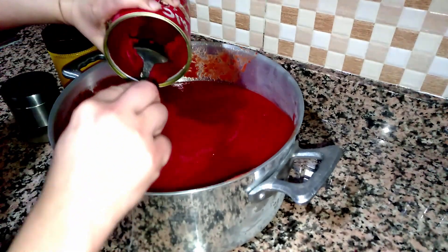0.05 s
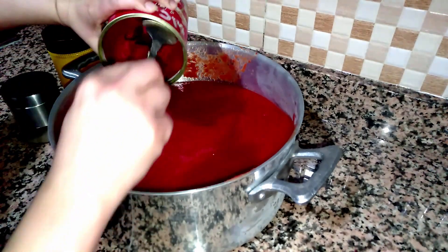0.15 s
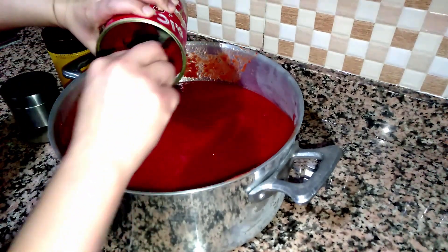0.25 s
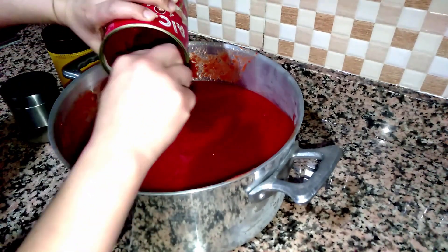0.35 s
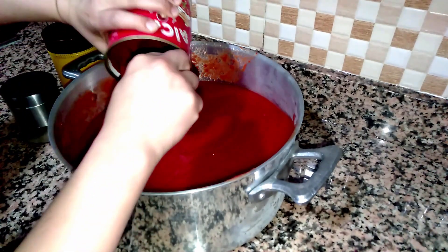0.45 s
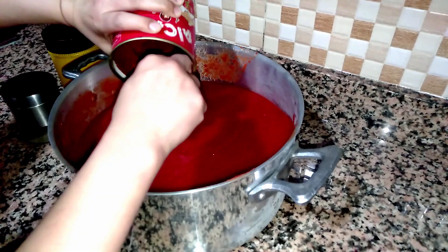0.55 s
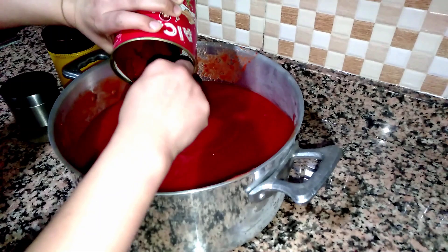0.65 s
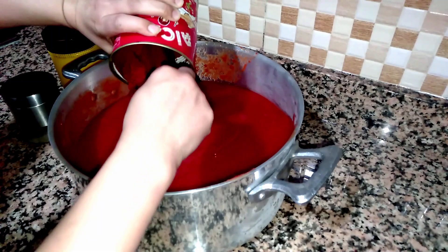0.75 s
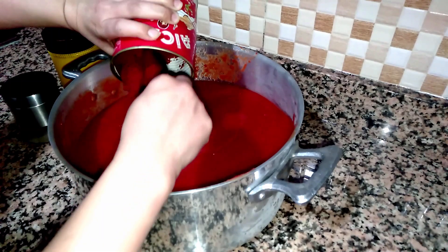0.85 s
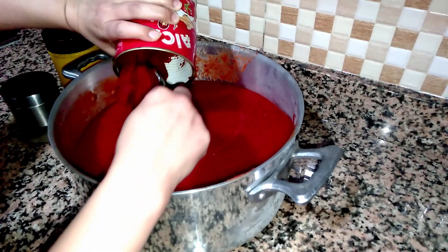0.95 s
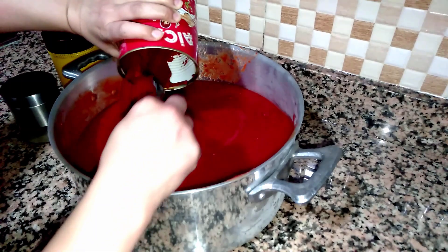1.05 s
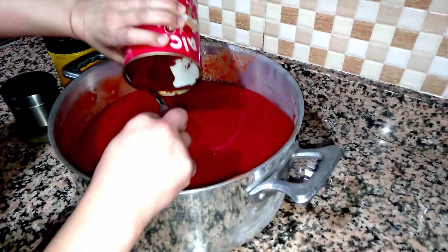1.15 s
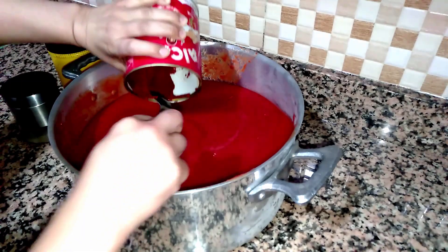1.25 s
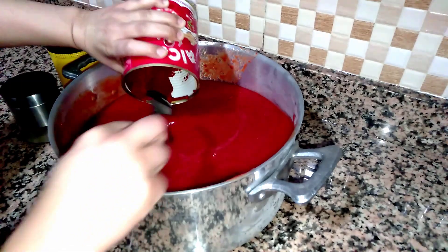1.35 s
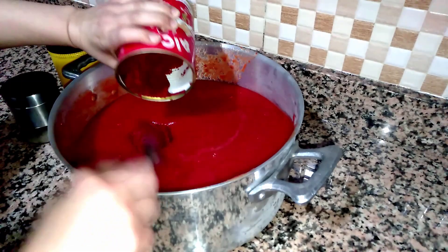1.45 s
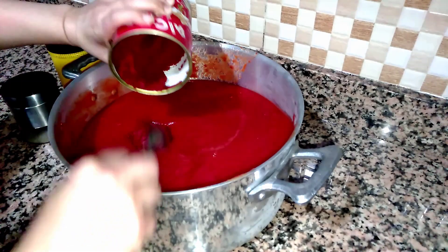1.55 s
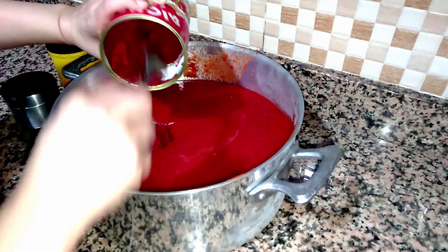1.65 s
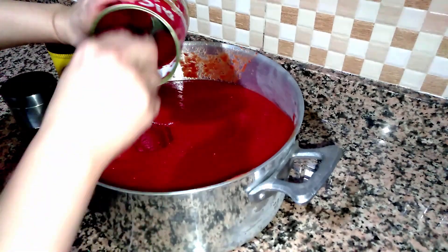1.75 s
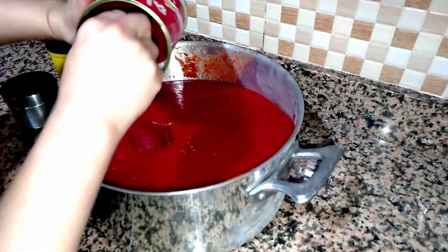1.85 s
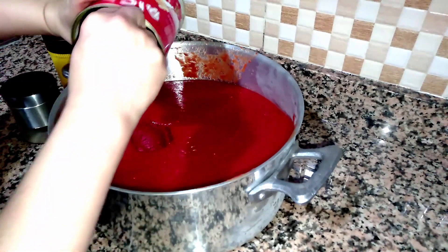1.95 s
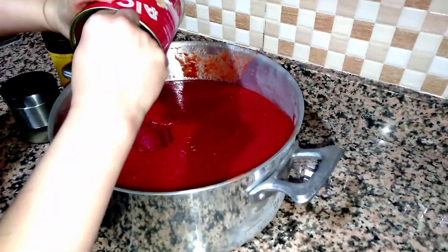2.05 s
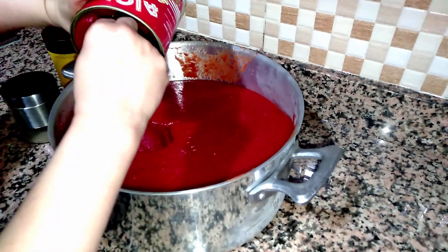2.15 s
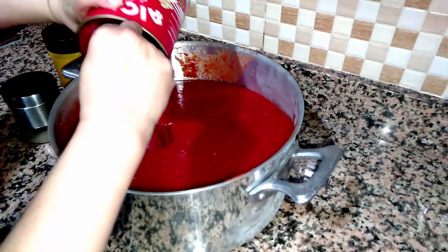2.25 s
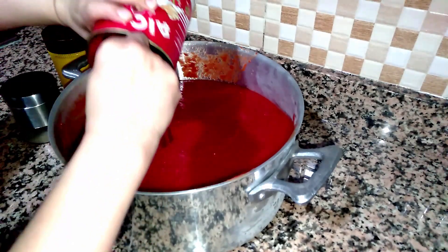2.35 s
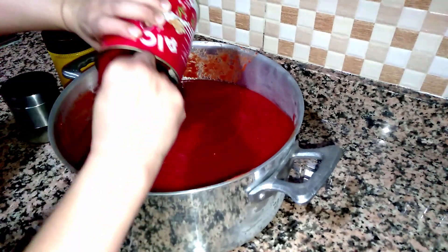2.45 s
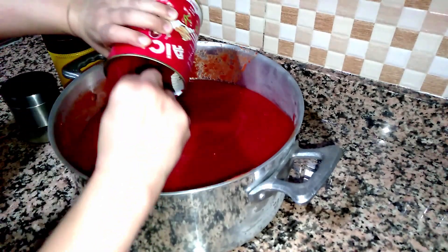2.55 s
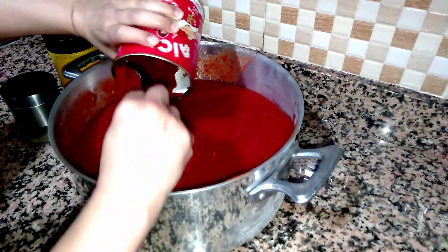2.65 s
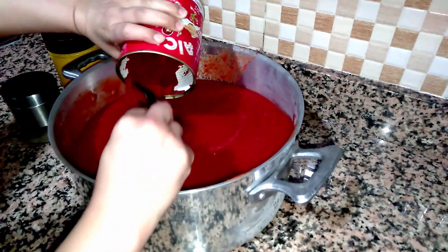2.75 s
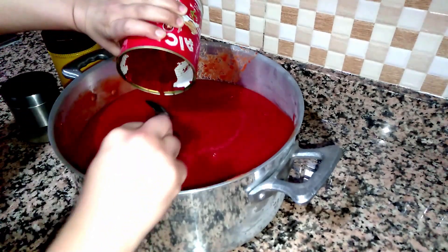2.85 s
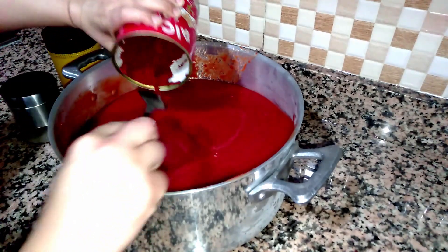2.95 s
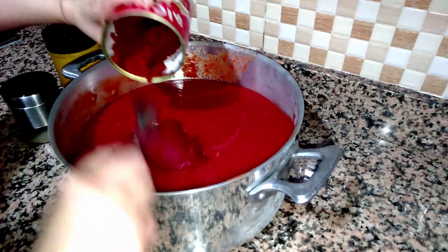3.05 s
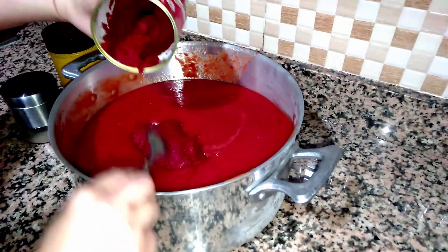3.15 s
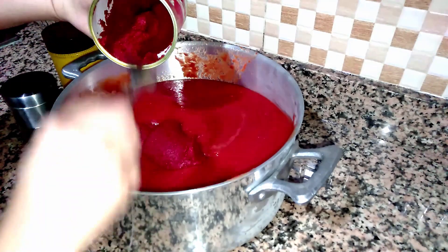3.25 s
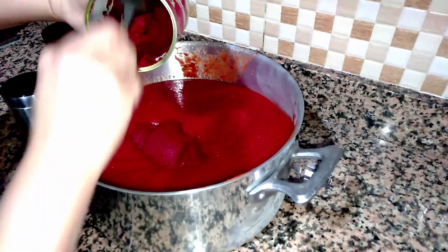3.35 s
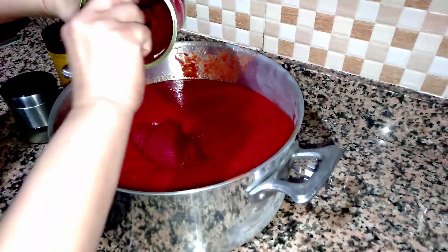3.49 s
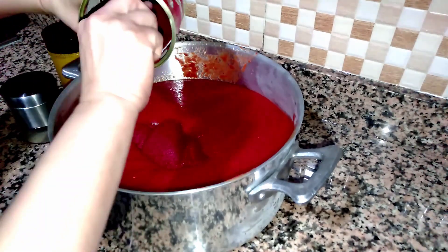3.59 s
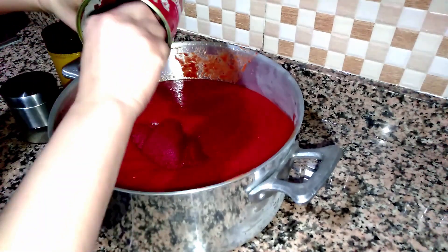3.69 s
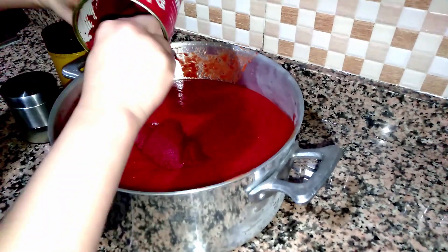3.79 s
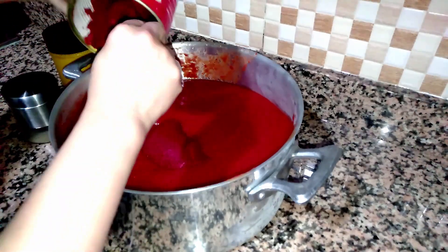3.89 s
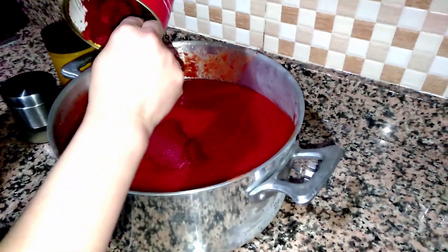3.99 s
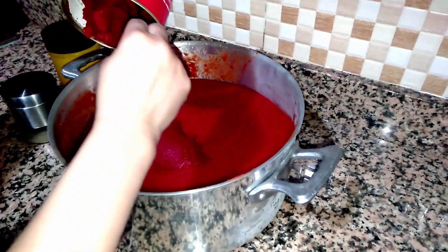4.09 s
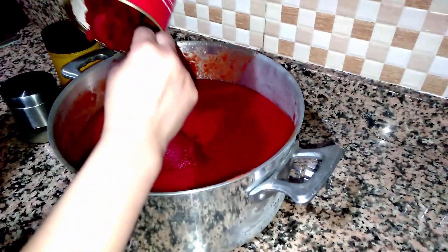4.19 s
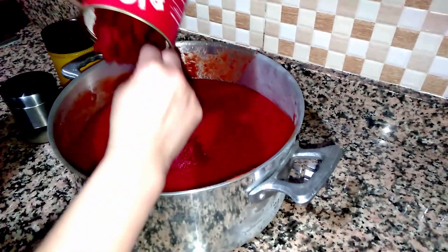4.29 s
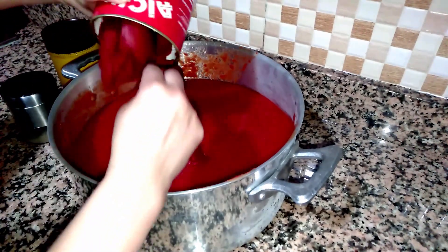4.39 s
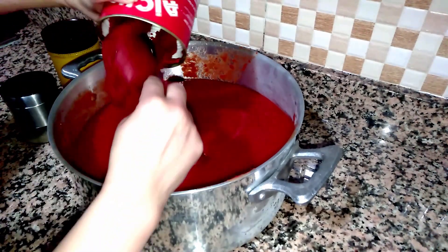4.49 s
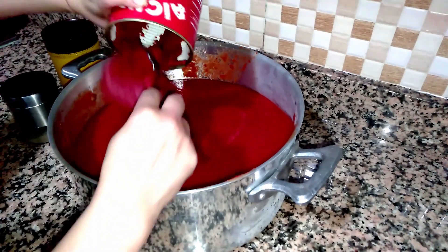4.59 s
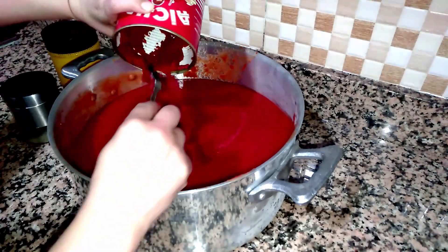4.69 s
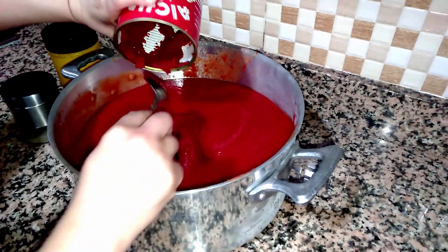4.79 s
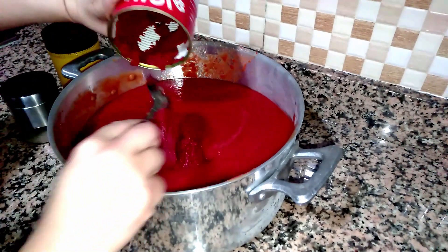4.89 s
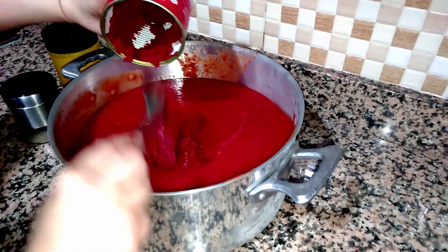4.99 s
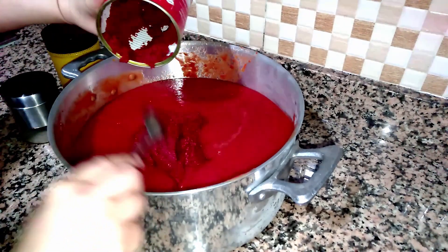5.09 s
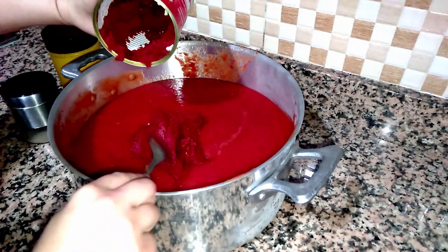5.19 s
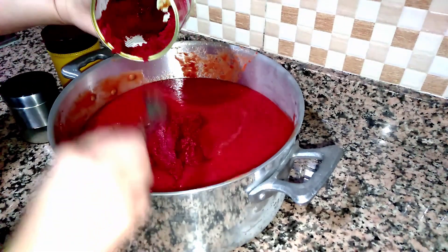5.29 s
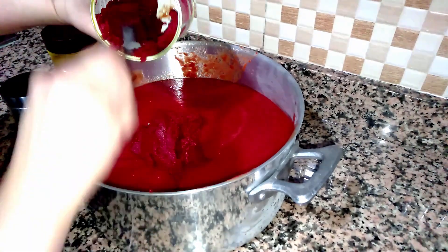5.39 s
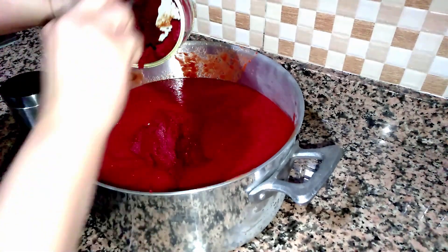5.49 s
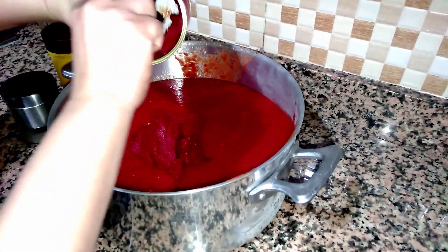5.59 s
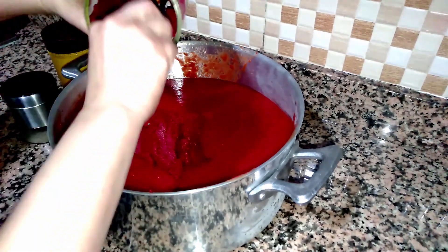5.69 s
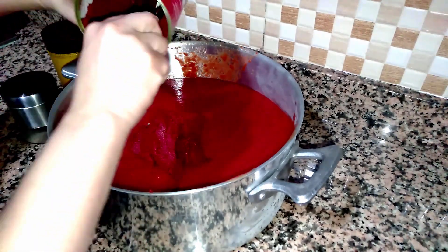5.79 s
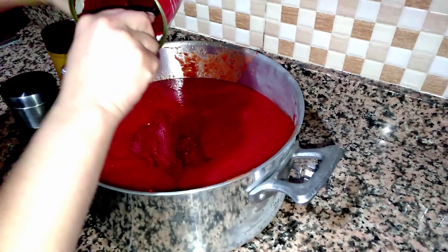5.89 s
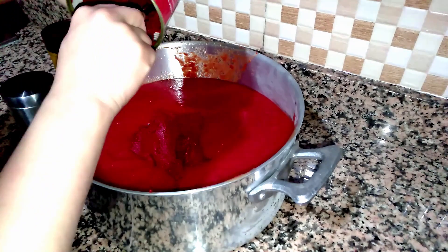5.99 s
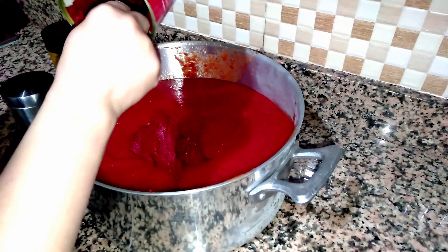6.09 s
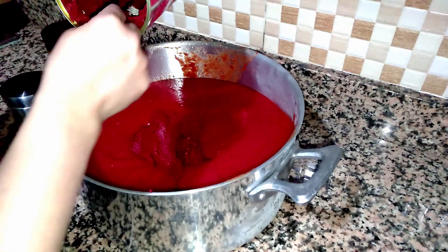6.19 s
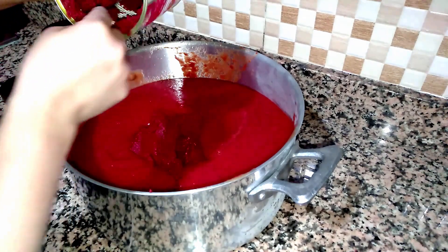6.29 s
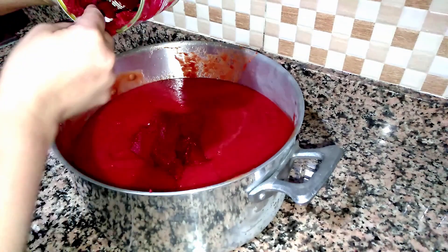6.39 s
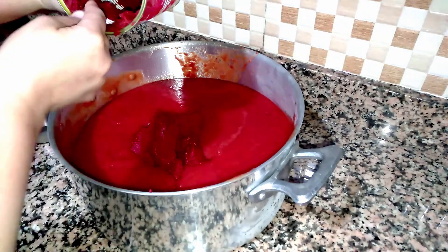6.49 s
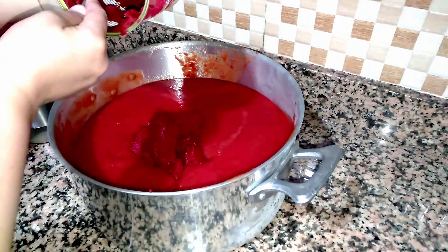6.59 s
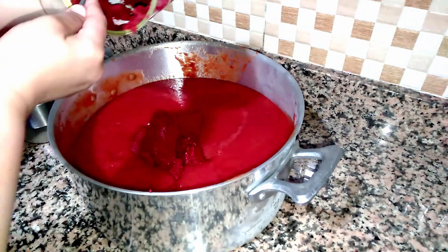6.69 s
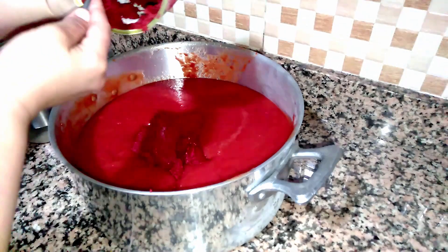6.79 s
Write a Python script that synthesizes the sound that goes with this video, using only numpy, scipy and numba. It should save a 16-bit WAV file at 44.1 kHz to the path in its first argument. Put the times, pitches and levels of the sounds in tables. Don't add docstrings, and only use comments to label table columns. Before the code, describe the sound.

Close, small kitchen: faint raspy spoon scrapes and tinny ticks in a can, with five sharp cracking knocks towering over them.

```python
import sys
import numpy as np
from scipy import signal
from scipy.fft import rfft, irfft, next_fast_len
from scipy.io import wavfile
from scipy.ndimage import map_coordinates
from numba import njit

SR = 44100
rng = np.random.default_rng(int(sys.argv[2]) if len(sys.argv) > 2 else 0)


def gain_from_db(level_db):
    decades = np.asarray(level_db, float) / 20
    return 10 ** decades


def to_wav(sig):
    pcm = np.clip(np.atleast_2d(sig), -1, 1) * 32767
    pcm = np.round(pcm).astype(np.int16)
    wavfile.write(sys.argv[1], SR, pcm.T)


N = 301644

# f/Hz, level/dB
AIR = [(12, -46.5), (20, 0), (60, 2), (108, -10.5), (160, -3.5), (300, -20.5), (479, -14), (994, -19),
       (1180, -17), (1280, -19), (3830, -25), (6170, -21), (12100, -23.5), (15200, -16), (16500, -31)]
HISS_DB, MURMUR_DB, RUMBLE_DB = -75, -76, -74.5
# f/Hz, time to fall 60 dB t60/s
KITCHEN = [(150, 0.63), (500, 0.39), (1500, 0.34), (6000, 0.35), (10000, .3), (16000, 0.21)]

# start t/s, hold t/s, pressure level/dB, wall over it level/dB, rasp over it level/dB
RUBS = [(0.137, .03, -67, -5, -1), (0.332, 0.012, -52, -10.5, 10.5), (0.95, 0.021, -63.5, -17, 11),
        (1.056, 0.064, -70.5, 5, -20), (1.106, .04, -72.5, 10.5, -17), (1.155, 0.1, -62.5, -5, -9),
        (1.3, .21, -67.5, -1.5, -14.5), (2.669, 0.0085, -61, -1.5, -0.5), (2.734, 0.018, -74, 19.5, -9.5),
        (2.797, 0.065, -59, -5, -22), (2.927, 0.09, -51.5, -1.5, -4.5), (3.21, 0.065, -57, -6, -5.5),
        (3.31, 0.31, -68.5, 0, -3.5), (3.498, .11, -58.5, -4, -1.5), (3.835, .09, -55.5, -2.5, -2),
        (4.766, 0.11, -63, 2.5, 5), (4.903, 0.078, -49.5, -6, 4), (5.096, 0.04, -47.5, 4.5, -2.5),
        (5.236, 0.13, -53.5, -12, -2), (5.376, .02, -54, -16, -1.5), (5.462, 0.14, -56.5, 0, -5.5),
        (5.683, 0.27, -64.5, -6, -4.5), (6.456, 0.1, -71, 0, 8.5), (6.559, 0.0068, -76, 18, 26)]
RISE_DB_PER_S, FALL_DB_PER_S = 902, 328
# t/s, wall f/Hz, nearest rim mode f/Hz
CONTACT = [
    [(0.1, 810, 1280), (0.166, 918, 1060), (0.25, 656, 1420), (0.34, 590, 2480)],
    [(0.93, 766, 1273), (1.05, 666, 1310), (1.12, 814, 1250), (1.17, 810, 1100), (1.28, 800, 1100),
     (1.4, 778, 1640), (1.5, 780, 1370)],
    [(2.66, 750, 1583), (2.78, 779, 1396), (2.94, 810, 1630), (2.98, 763, 1380), (3.21, 665, 1650),
     (3.35, 727, 1230), (3.45, 554, 1390), (3.62, 595, 1430), (3.85, 635, 1785)],
    [(4.76, 720, 1770), (4.95, 736, 1780), (5.07, 706, 1750), (5.12, 593, 1610), (5.31, 710, 1740),
     (5.39, 660, 2900), (5.46, 760, 1580), (5.56, 672, 1520), (5.92, 693, 1496)],
    [(6.45, 518, 1400), (6.54, 486, 1100)],
]
# f/Hz, width f/Hz, level/dB
RIM = [(1100, 160, 1), (1259, 210, 1), (1580, 270, -5.5), (1730, 180, -2), (2000, 65, 0.5),
       (2194, 120, 3.5), (2740, 200, 3), (3516, 280, -1)]
# f/Hz, width f/Hz, level/dB
SPOON = [(3020, 83, -5), (4080, 150, -3), (4760, 150, -7.5), (5280, 90, -4), (6120, 170, 2.5),
         (6550, 47, 2), (6960, 50, -5.5)]
# f/Hz, level per Hz/dB
RASP = [(1470, -32.5), (2500, -8), (2860, -12.5), (3270, -5.5), (5010, -6), (6500, -2.5), (10700, -17.5),
        (15200, 1.5), (16100, -16.5), (16500, -16)]
# t/s, f/Hz, level/dB
SQUEAK = [(3.56, 565, -66), (3.578, 595, -52), (3.6, 598, -55), (3.615, 600, -51), (3.655, 601, -53),
          (3.68, 606, -68), (3.69, 606, -80), (3.708, 610, -67), (3.728, 615, -85)]
# f/Hz, level/dB
THIN_CAN = [(120, -21.5), (300, -10), (480, -2)]

# t/s, click level/dB, wall ring over click level/dB, rim ring over click level/dB
TAPS = [(0.166, -60, -2.5, -15), (0.9353, -29.5, -24, -9), (2.6643, -48.5, -7.5, 4.5),
        (2.7871, -37.5, -2, -0.5), (2.8689, -64, -22, -3), (2.9012, -47, -7, -4), (2.9312, -48, -16, -9),
        (2.9714, -53.5, 13.5, 16.5), (3.026, -52, -1, 13.5), (3.2146, -60.5, -8, -6),
        (3.8344, -57.5, -4, -4), (3.9529, -55, -10, -13), (4.7592, -54, -18, -1.5),
        (4.8728, -41.5, -22, -24), (4.9794, -53.5, 1, -12), (5.0221, -51.5, 1.5, 8.5),
        (5.0624, -49.5, 6, 7), (5.095, -31.5, -7, -4), (5.2735, -56.5, -4, 13.5), (5.4564, -68.5, 9.5, 13),
        (5.5452, -51.5, -16, 2.5), (6.5344, -58.5, 0, -29)]
# t/s, click level/dB, sparkle above 10 kHz level/dB
TICKS = [(0.0333, -57, 8), (0.148, -70.5, 12), (0.2128, -53.5, -20), (0.247, -70, 14), (0.323, -49, 3),
         (0.3404, -48, 3), (1.9515, -58.5, 0), (2.1896, -55, 0.5), (3.6447, -57, 2.5), (3.806, -63.5, -1),
         (4.0377, -47, -8), (5.937, -61, -4), (6.0053, -53.5, -20), (6.0886, -63, 8.5), (6.114, -63.5, -20),
         (6.56, -42.5, 1)]
TICK_RING_DB = -29.5

# t/s, level/dB, t60/s
THUDS = [
    (5.095, -37, 0.12),
    (6.533, -52.5, 0.34),
]
# f/Hz, level per Hz/dB
BELLY = [(180, -40), (330, 0.5), (520, -5), (1050, -7), (1400, -41)]

# t/s, thud level/dB, boom level/dB
BUMPS = [
    (0.328, -61.5, -13.5),
    (3.953, -59, -13.5),
    (6.533, -54.5, 4.5),
]
# t/s, peak level/dB, counter boom level/dB, crack level/dB
KNOCKS = [
    (0.686, -7.5, -41, -4),
    (2.3063, -10.5, -40.5, -4),
    (4.282, -4.5, -43, -8.5),
    (4.431, -7, -46.5, -6.5),
    (6.72, -15, -36.5, -1.5),
]
# f/Hz, level/dB, t60/s
BLOCK = [(355, -2, 0.065), (476, 7.5, 0.037), (665, -5, .05), (1062, -17.5, 0.073), (1440, -5.5, .03),
         (1561, 3.5, 0.025), (1673, -23.5, 0.096), (2332, -8, .05), (2516, -7, 0.032), (5045, -12.5, 0.08),
         (5190, -12.5, 0.044), (6300, -8, 0.026), (6640, -18.5, 0.018)]
# f/Hz, level per Hz/dB
CRACK = [(200, -24), (450, -7.5), (1000, -13), (1500, -8.5), (2000, -17.5), (3100, -12.5), (3800, -15.5),
         (5100, -6.5), (6600, -0.5), (8300, -18.5), (10300, -13.5), (12700, -17), (15400, -2),
         (16500, -32.5)]
DRAWER_DB, LOW_BODY_DB = -43.5, -12.5

TOP_HZ = 16200
# lowest f/Hz, list of t/s
GAPS = [
    (1200, [0.298, 0.544, 0.886, 1.568, 1.782, 1.824, 2.016, 3.744, 4.064, 6.411, 6.475]),
    (2000, [0.48, 1.099, 1.483, 1.654, 4.832]),
    (3000, [1.163, 1.206, 2.998, 3.275, 3.83, 3.979, 4.192, 5.984]),
    (4500, [1.44, 3.147, 5.792, 5.835]),
    (7500, [2.955, 4.363, 4.619, 5.43, 5.472]),
]
# t/s, length in frames, lowest f/Hz
LONG_GAPS = [
    (0.096, 2, 3000),
    (0.947, 3, 1500),
    (1.355, 2, 300),
    (3.403, 4, 3000),
    (4.704, 2, 600),
    (6.326, 2, 2000),
    (6.53, 2, 3000),
]
THINNED = [0.319, 2.827, 2.912, 2.955, 3.552, 3.915, 4.896, 4.939, 5.302, 6.795]


def unit(x):
    return x / np.sqrt(np.mean(np.abs(x) ** 2) + 1e-20)


def along(points, hz):
    f, v = np.transpose(points)
    return np.interp(np.log(hz + 1), np.log(f + 1), v)


def wobble(rate):
    knots = rng.standard_normal(int(N * rate / SR) + 4)
    return map_coordinates(knots, [np.arange(N) * rate / SR])


def coloured(x, spectrum):
    m = next_fast_len(len(x) + 8192)
    gain = gain_from_db(along(spectrum, np.fft.rfftfreq(m, 1 / SR)))
    return irfft(rfft(x, m) * gain, m)[:len(x)]


def ring(t, hz, t60, attack):
    return np.sin(2 * np.pi * hz * t) * gain_from_db(-60 * t / t60) * (1 - np.exp(-t / attack))


def add(track, s, sound):
    part = track[round(s * SR):][:len(sound)]
    part += sound[:len(part)]


def tail(length):
    hz, t, z = signal.stft(rng.standard_normal(length), SR, nperseg=256)
    decay = gain_from_db(-60 * t / along(KITCHEN, hz)[:, None])
    x = signal.istft(z * decay, SR, nperseg=256)[1]
    return np.pad(x / np.linalg.norm(x), (130, 0))


def air():
    hiss_db, murmur_db, rumble_db = [db + 0.27 * wobble(1.9) for db in (HISS_DB, MURMUR_DB, RUMBLE_DB)]
    noise = coloured(rng.standard_normal(N), AIR)
    low = coloured(noise, [(250, 0), (400, -60)])
    high = coloured(noise, [(2200, -60), (3500, 0)])
    rumble = gain_from_db(rumble_db + 2 * wobble(5)) * unit(low)
    murmur = gain_from_db(murmur_db) * unit(noise - low - high)
    return rumble + murmur + gain_from_db(hiss_db) * unit(high)


def contact(s):
    when, wall_hz, rim_hz = np.concatenate(CONTACT).T
    return np.interp(s, when, wall_hz), np.interp(s, when, rim_hz)


def strokes(time):
    power = np.full((3, N), 1e-12)
    for s, hold, db, wall_db, rasp_db in RUBS:
        rise_db = -RISE_DB_PER_S * np.maximum(s - time, 0)
        fall_db = -FALL_DB_PER_S * np.maximum(time - s - hold, 0)
        power += gain_from_db(db + rise_db + fall_db + np.array([[wall_db], [0], [rasp_db]])) ** 2
    return 10 * np.log10(power)


def grit(rate, spread_db, hiss):
    catches = rng.random(N) < rate / SR * gain_from_db(4 * wobble(35))
    size = gain_from_db(spread_db * np.minimum(rng.exponential(size=N), 2)) * np.sign(rng.standard_normal(N))
    force = unit(catches * size) + hiss * rng.standard_normal(N)
    return unit(force) * gain_from_db(1.5 * wobble(30))


@njit
def resonate(push, hz, width, sr):
    out, z = np.zeros(len(push)), 0j
    for i in range(len(push)):
        r = np.exp(-np.pi * width[i] / sr)
        z = z * r * np.exp(2j * np.pi * hz[i] / sr) + push[i] * np.sqrt(1 - r * r)
        out[i] = z.imag
    return out


def ring_twice(push, hz, width):
    hz, width = hz * np.ones(N), width * np.ones(N)
    sharp = resonate(push, hz, width, SR)
    return unit(resonate(sharp, hz, 4 * width, SR))


def squeak(time):
    s, hz, db = np.transpose(SQUEAK)
    swell = np.interp(time, s, gain_from_db(db + 2), left=0, right=0)
    return swell * np.sin(2 * np.pi * np.cumsum(np.interp(time, s, hz)) / SR)


def scraping():
    time = np.arange(N) / SR
    wall_db, rim_db, rasp_db = strokes(time)
    wall_hz, rim_hz = contact(time)
    push = grit(300, spread_db=5, hiss=0.73)
    scratch = grit(700, spread_db=4, hiss=0.56)
    wall = ring_twice(push, wall_hz, 68) + 0.34 * ring_twice(push, 560, 220)
    near = [np.exp(-(np.log(hz / rim_hz) / .11) ** 2) + .27 for hz, _, _ in RIM]
    share = np.sqrt(np.sum(np.square(near), axis=0))
    rim, chink = np.zeros(N), np.zeros(N)
    for closeness, (hz, width, db) in zip(near, RIM):
        rim += gain_from_db(db + 4.3 * wobble(40)) * closeness / share * ring_twice(push, hz, width)
    for hz, width, db in SPOON:
        chink += gain_from_db(db + 5.3 * wobble(40)) * ring_twice(scratch, hz, width)
    rasp = unit(coloured(scratch, RASP)) + 0.89 * unit(chink)
    rub = gain_from_db(wall_db - 1) * unit(wall) + gain_from_db(rim_db - 2.5) * unit(rim) + gain_from_db(rasp_db - 6) * unit(rasp)
    rub += squeak(time)
    return rub + gain_from_db(-8.5) * signal.fftconvolve(rub, tail(SR // 2))[:N]


def taps():
    out, t = np.zeros(N), np.arange(SR // 8) / SR
    rows = [(*tap, 0) for tap in TAPS]
    rows += [(s, db, TICK_RING_DB, TICK_RING_DB, top_db) for s, db, top_db in TICKS]
    for s, db, wall_db, rim_db, top_db in rows:
        wall_hz, rim_hz = contact(s)
        steel = unit(coloured(rng.standard_normal(len(t)), RASP))
        steel = coloured(steel, [(8500, 0), (10500, top_db)])
        click = steel * (gain_from_db(db - 60 * t / .01) + gain_from_db(db - 9 - 60 * t / 0.028))
        chink = np.zeros(len(t))
        for hz, _, level in SPOON:
            chink += gain_from_db(db + level - 10 + rng.normal(0, 2.5)) * ring(t, hz, 0.03, 0.00033)
        wall = ring(t, wall_hz, 0.047, 0.00091) + .4 * ring(t, .7 * wall_hz, 0.018, 0.00166)
        rim = gain_from_db(db + rim_db + 4) * ring(t, rim_hz, 0.022, 0.00057)
        tap = click + chink + gain_from_db(db + wall_db + 10) * wall + rim
        add(out, s, tap)
        add(out, s, gain_from_db(-3.5) * signal.fftconvolve(tap, tail(SR // 3)))
    return out


def thuds():
    out, t = np.zeros(N), np.arange(SR // 3) / SR
    for s, db, t60 in THUDS:
        puff = unit(coloured(rng.standard_normal(len(t)), BELLY))
        add(out, s, puff * gain_from_db(db - 60 * t / t60) * (1 - np.exp(-t / 0.00031)))
    return out


def counter(t, boom_db, thud_db):
    slab = ring(t, 80, 1.08, 0.046)
    drawers = ring(t, 151, 0.27, 0.0071) + 0.39 * ring(t, 132, 0.71, 0.0067)
    return gain_from_db(boom_db) * slab + gain_from_db(thud_db) * drawers


def bumps():
    out, t = np.zeros(N), np.arange(SR) / SR
    for s, db, boom_db in BUMPS:
        add(out, s, counter(t, db + boom_db + 5.5, db + 6))
    return out


def struck_body(t):
    hz, level, t60 = np.transpose(BLOCK)[..., None]
    strength = level + rng.normal(0, 1.5, hz.shape) + LOW_BODY_DB * (hz < 800)
    modes = 0
    for share, spread in ((1, .003), (0.5, .025), (0.12, .05)):
        modes = modes + share * ring(t, hz * (1 + rng.normal(0, spread, hz.shape)), t60, 0.0013)
    return (gain_from_db(strength) * modes).sum(axis=0)


def first_crack(t):
    fade = gain_from_db(-60 * t / 0.003) + 0.51 * gain_from_db(-60 * t / 0.022) + 0.12 * gain_from_db(-60 * t / 0.14)
    return unit(coloured(rng.standard_normal(len(t)), CRACK)) * fade * (1 - np.exp(-t / 0.00043))


def knocks():
    out, t = np.zeros(N), np.arange(SR) / SR
    short = t[:SR // 4]
    for s, db, boom_db, crack_db in KNOCKS:
        s = s + .0005
        body = struck_body(short)
        blow = gain_from_db(db - 13.5) * body + gain_from_db(db + crack_db) * first_crack(short)
        add(out, s, blow)
        for delay in rng.uniform(0.0054, .04, size=6):
            add(out, s + delay, gain_from_db(-21 - 200 * delay) * rng.choice([-1, 1]) * blow)
        into_room = blow - 0.11 * gain_from_db(db - 15) * body
        add(out, s, gain_from_db(-7.5) * signal.fftconvolve(into_room, tail(SR // 2)))
        add(out, s, counter(t, db + boom_db + 7.5, DRAWER_DB))
    return out


def scene():
    can = coloured(taps() + scraping(), THIN_CAN)
    return (air() + can + thuds() + bumps() + knocks())[None]


def starve(x, table, keep):
    hop, out = 941, x.copy()
    window = np.sin(np.pi * (np.arange(2 * hop) + .5) / (2 * hop))
    hz = np.fft.rfftfreq(2 * hop, 1 / SR)
    for s, frames, lowest_hz in table:
        for start in round(s * SR) + hop * (np.arange(frames, dtype=int) - 1):
            z = rfft(window * x[start:start + 2 * hop])
            band = (hz > lowest_hz) & (hz < 14800)
            limit = np.quantile(np.abs(z[band]), 1 - np.clip(keep / frames ** 2, 0, 1))
            weak = band & (np.abs(z) < limit)
            out[start:start + 2 * hop] -= .98 * window * irfft(z * weak)
    return out


def roll_off(x):
    return signal.sosfilt(signal.butter(12, 17150, fs=SR, output="sos"), x)


def record(dry):
    held = dry[0] / (1 + np.abs(dry[0] / .3) ** 4) ** .25
    edge = [(20, 0), (TOP_HZ, 0), (1.03 * TOP_HZ, -10), (17100, -30), (17300, -120)]
    gaps = LONG_GAPS + [(s, 1, hz) for hz, times in GAPS for s in times]
    thin = [(s, 1, 2300) for s in THINNED]
    gappy = starve(coloured(held, edge), gaps, keep=0.12)
    mix = starve(gappy, thin, keep=0.13)
    return roll_off(mix[None])


dry = scene()
out = record(dry)
to_wav(out)
```